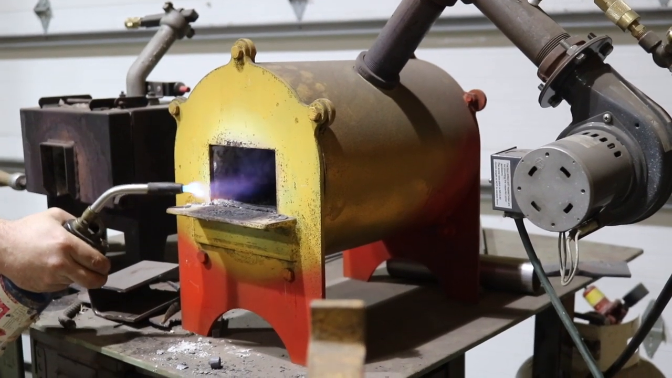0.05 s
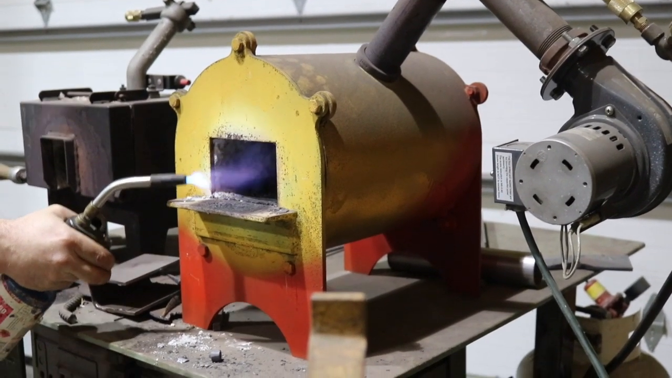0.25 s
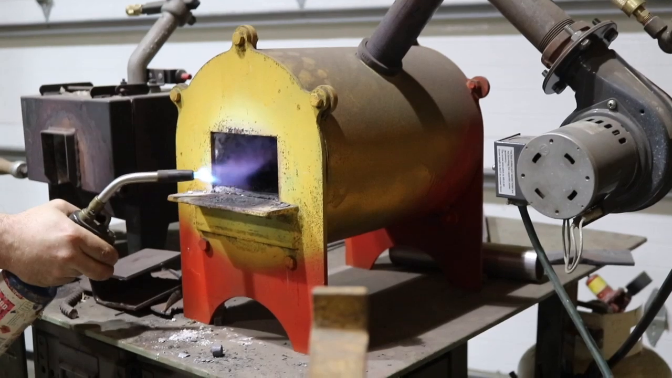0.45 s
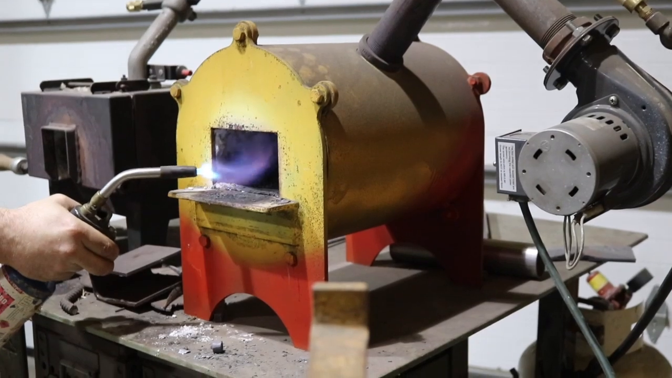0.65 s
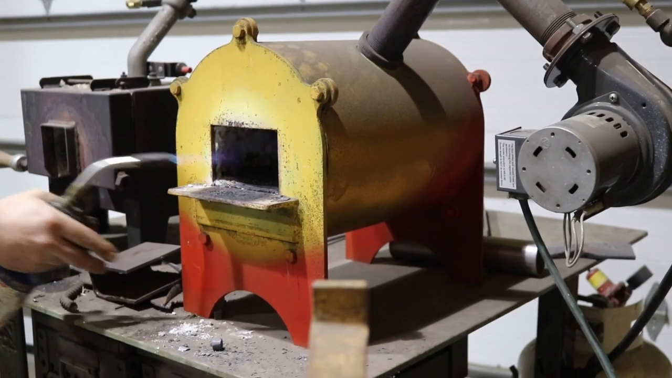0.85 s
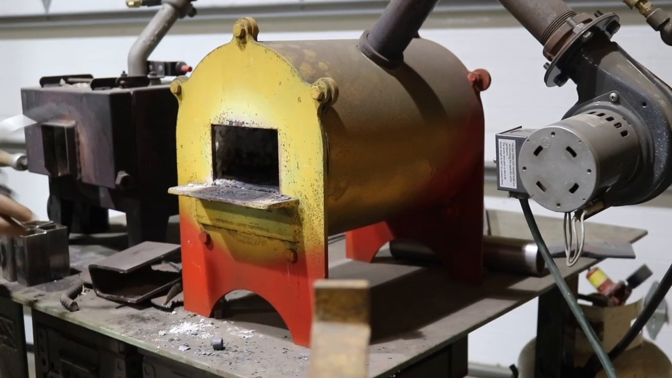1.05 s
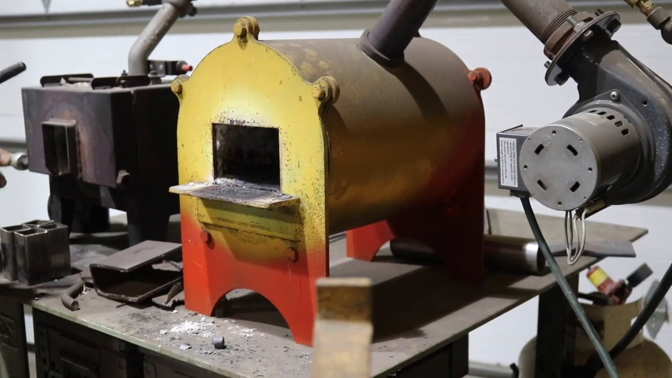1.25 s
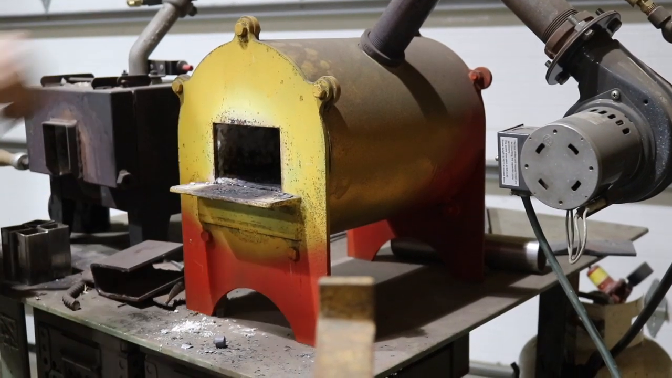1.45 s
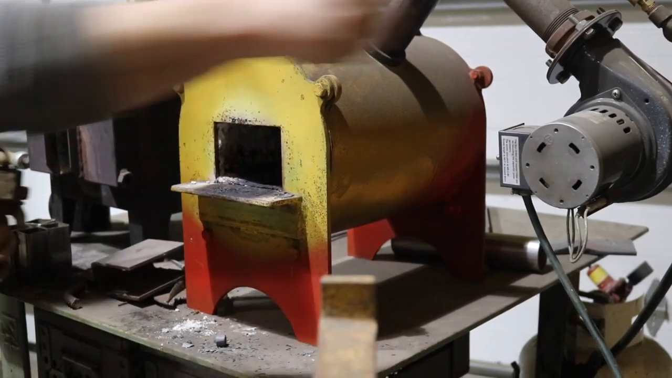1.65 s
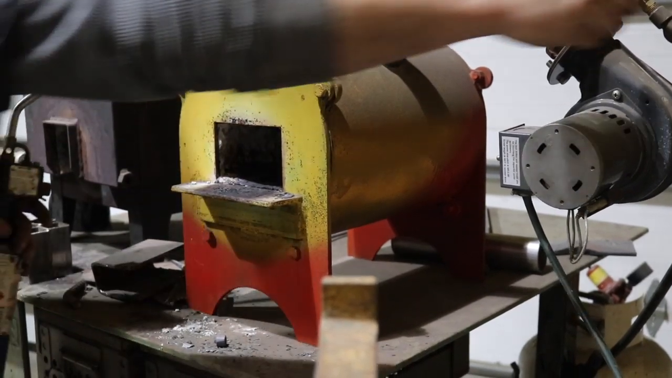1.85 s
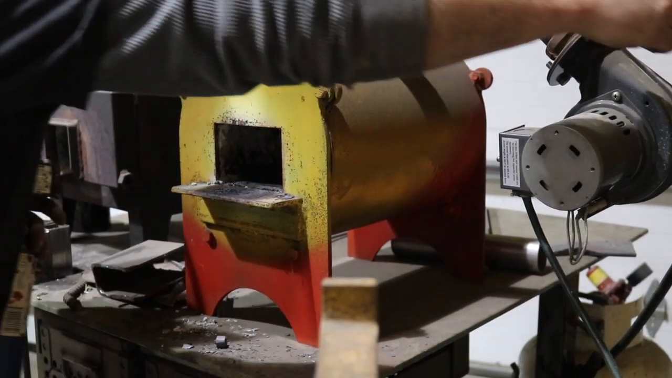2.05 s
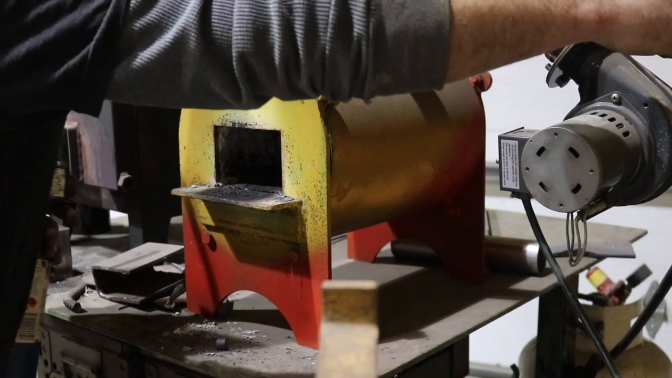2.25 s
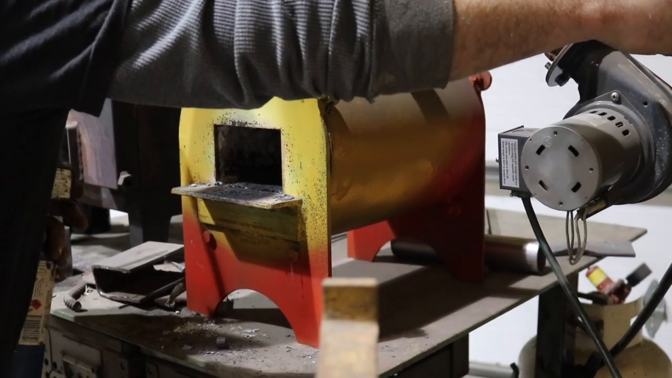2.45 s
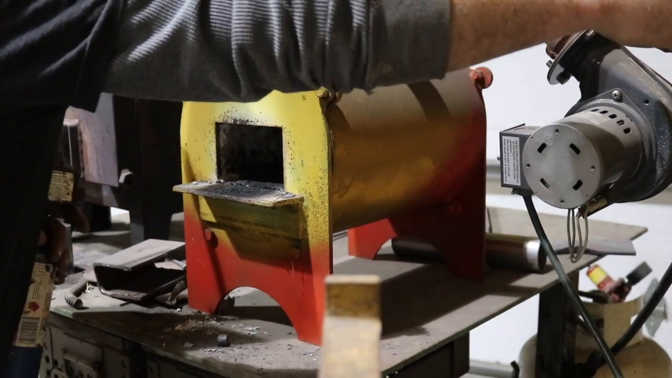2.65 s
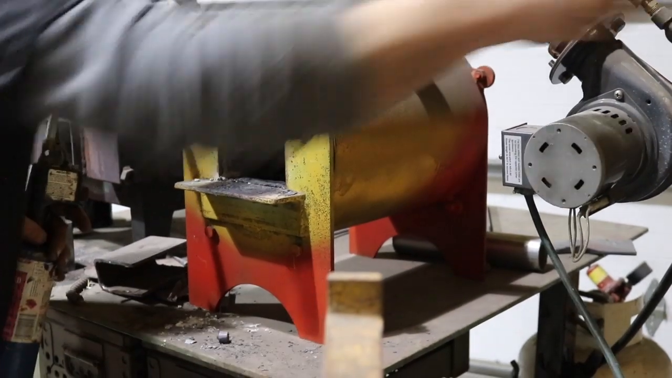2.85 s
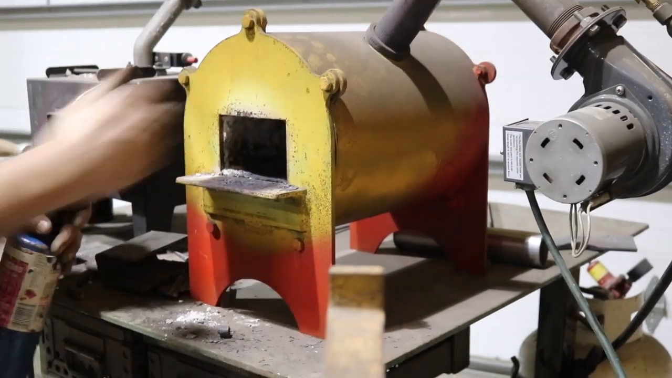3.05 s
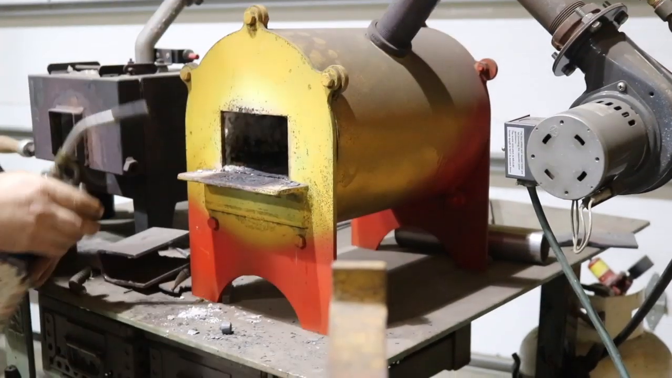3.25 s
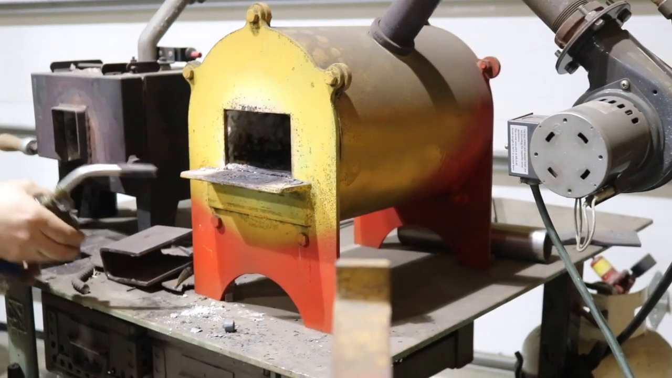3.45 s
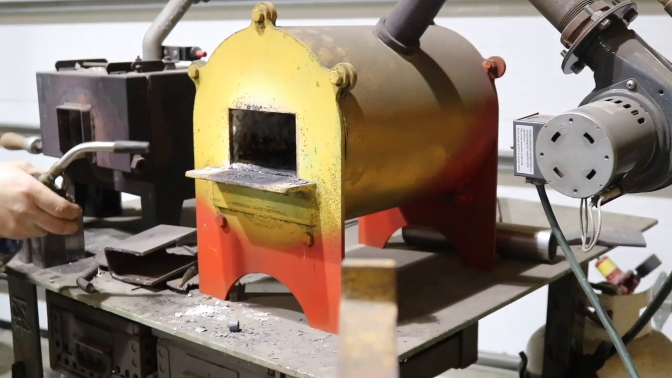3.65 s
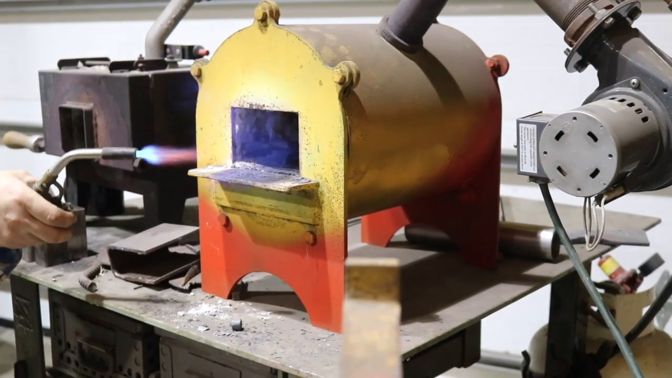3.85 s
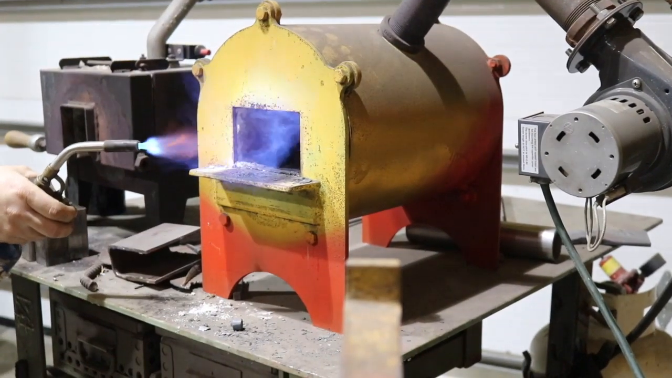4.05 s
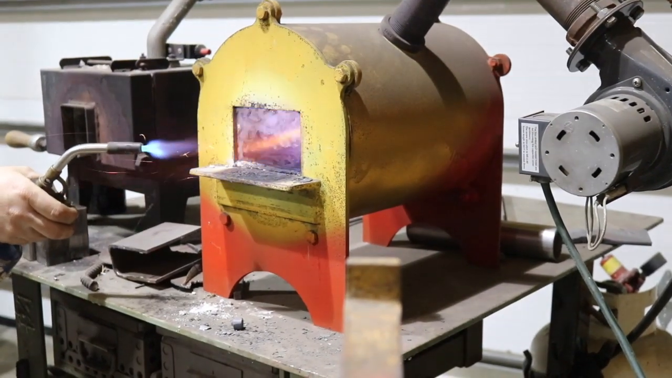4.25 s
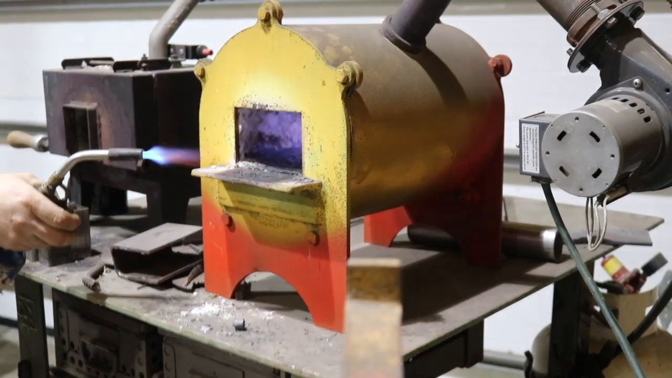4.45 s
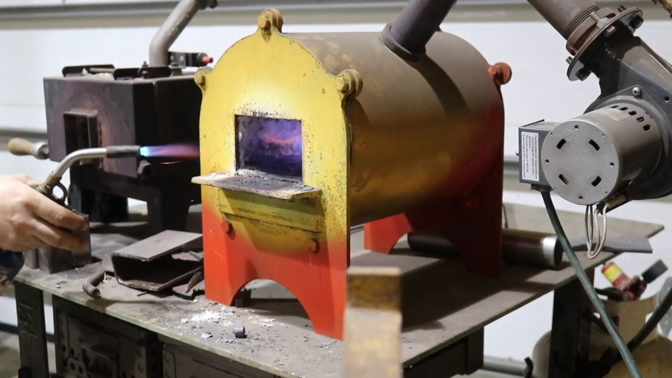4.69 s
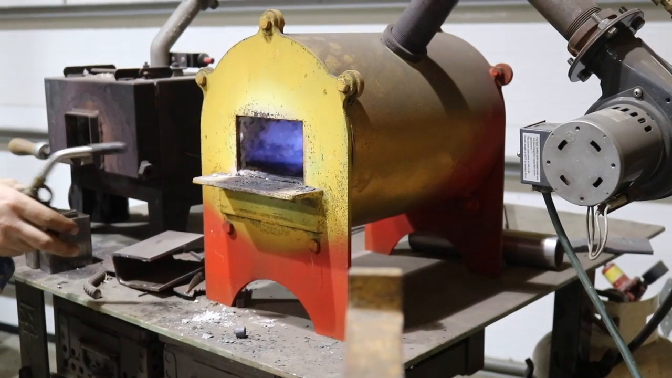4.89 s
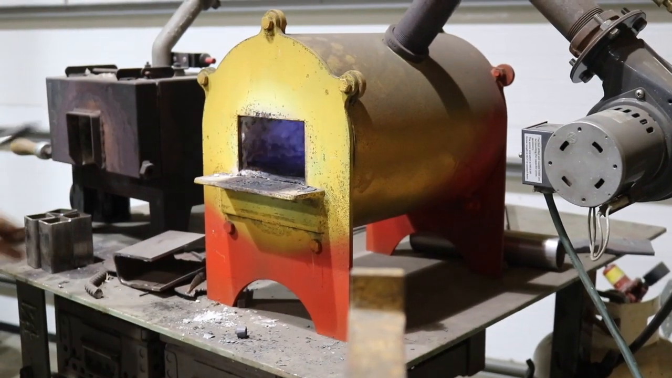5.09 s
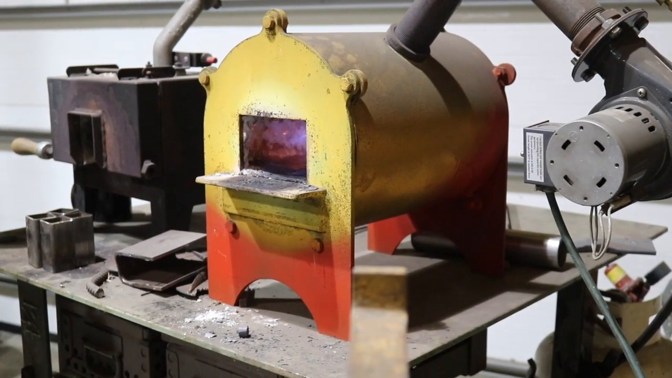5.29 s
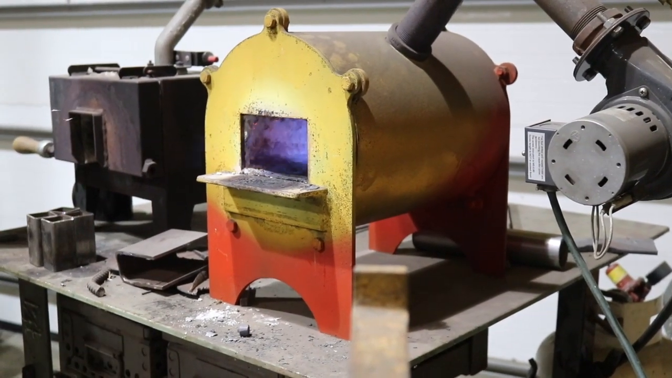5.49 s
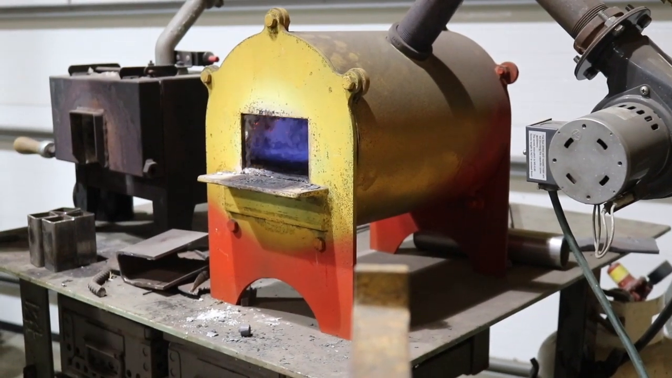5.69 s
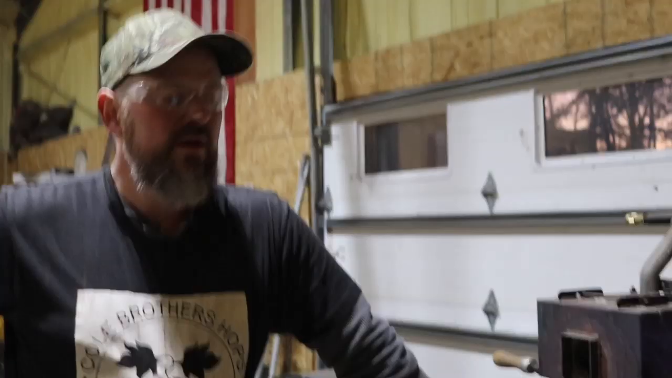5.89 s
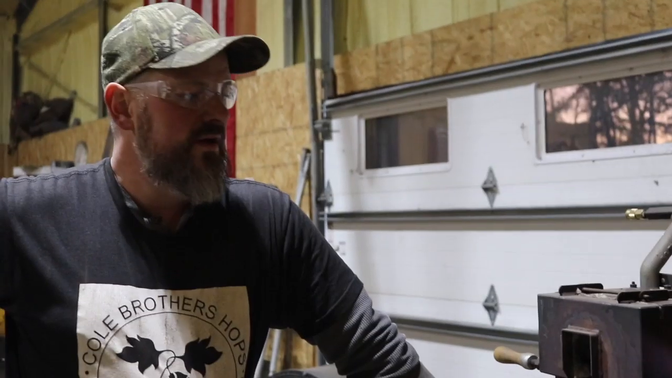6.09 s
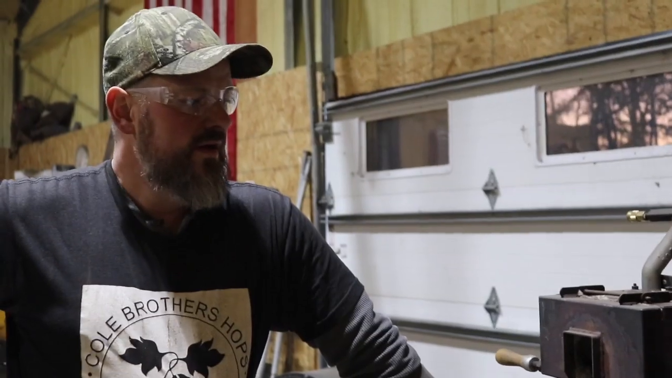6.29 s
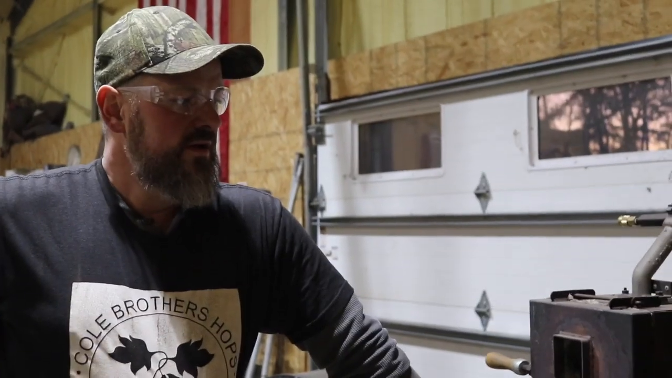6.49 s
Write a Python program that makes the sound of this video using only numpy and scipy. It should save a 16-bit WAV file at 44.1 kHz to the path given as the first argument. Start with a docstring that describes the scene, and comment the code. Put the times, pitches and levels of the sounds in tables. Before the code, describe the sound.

Torch flame roaring, near-quiet with blower hum and clicks, a sharp igniter crack, then a forge thudding alight into an uneven low roar.

```python
"""A gas torch roars at the mouth of a forge, shuts off, and is struck again once the gas valve is open.
Its flame is a shower of small pressure pops plus turbulent noise, with nozzle hiss above; it lights with a thump.
Clicks are cracks that ring metal, the valve is whistling noise, and scuffs are brushed noise with scratchy grains.
The burner catches and throbs as pockets of gas ring its chamber; after a short dropout it roars in quick uneven
surges. A blower of coloured noise and a thin whine runs beneath. Two close ports hear all this with the shop's echo."""
import sys
import numpy as np
from scipy import signal
from scipy.fft import rfft, irfft, next_fast_len
from scipy.io import wavfile
from scipy.ndimage import uniform_filter1d

SR = 44100
rng = np.random.default_rng(int(sys.argv[2]) if len(sys.argv) > 2 else 0)


def digitize_waveform(pressure):
    """Quantize a signal to 16-bit integers and store it at the path in sys.argv[1].

    Rows of a 2-D input are taken as channels; values are limited to [-1, 1].
    """
    field = np.atleast_2d(pressure).T
    bounded = np.clip(field, -1, 1)
    quanta = np.round(bounded * 32767).astype(np.int16)
    wavfile.write(sys.argv[1], SR, quanta)


N = 287835
T = np.arange(N) / SR
SIZE = next_fast_len(N + SR)
HZ = np.maximum(np.arange(SIZE // 2 + 1) * SR / SIZE, 1)

# Flame body as the torch is aimed and drawn back, one list a burn. Each row: time in seconds, level in dB.
TORCH_LEVELS = [
    [(0, -24.5), (.58, -26), (.78, -24), (.865, -35), (.905, -57)],
    [(3.72, -32.5), (3.9, -23.5), (4.15, -25), (4.235, -21.5), (4.33, -31), (4.42, -24), (4.6, -28),
     (4.71, -25.5), (4.76, -31), (4.82, -63)],
]
# Torch burns. Each row: gas on in seconds, lit in seconds, then rasp and nozzle hiss in dB re the flame body.
TORCH_BURNS = [(-.5, -.4, -1, -10.5), (3.73, 3.822, -8.5, -12)]
# Spectrum of the round flame body. Each row: frequency in Hz, density in dB per Hz.
FLAME_SPECTRUM = [(25, -33), (90, -13.5), (160, -5.5), (280, -12), (360, -1), (480, -5), (650, -1),
                  (850, -4.5), (1250, -14.5), (1700, -24), (2600, -29)]
# Spectrum of the raspy flame. Each row: frequency in Hz, density in dB per Hz.
RASP_SPECTRUM = [(700, -16), (1200, 1.5), (1900, 0.5), (2500, -6.5), (2950, -4.5), (3600, -15), (4300, -27)]
# Spectrum of gas hissing from the nozzle. Each row: frequency in Hz, density in dB per Hz.
NOZZLE_SPECTRUM = [(2500, -32), (4000, 0), (5850, 2), (8500, 2), (12000, 0), (16000, -11.5)]
# Spectrum of the blower's rushing air. Each row: frequency in Hz, density in dB per Hz.
BLOWER_SPECTRUM = [(25, -26), (120, -10.5), (240, -11.5), (310, -3.5), (550, -4.5), (1100, -3), (1600, -7),
                   (2300, -13.5), (3200, -13), (4500, -24), (8000, -24), (12000, -32), (16000, -34.5)]
# Fan housing resonances. Each row: frequency in Hz, width in Hz, gain in dB.
HOUSING_RINGS = [(1547, 36, 5.5), (1760, 89, -2.5), (2069, 46, 6.5)]
# Trigger, igniter and handling clicks. Each row: start in seconds, level in dB, time to die by 60 dB in
# seconds, dullness in dB per octave, metal ring in dB re the click's level.
CLICK_EVENTS = [(0.813, -20, 0.018, 3, -27), (1.6052, -23.5, 0.04, -1, -5), (1.8022, -28, 0.09, -2, -35),
                (3.491, -27, .02, 3, -25), (3.8347, -4, 0.011, -3, -41), (3.8364, -8, 0.02, 0, -26),
                (4.712, -22, .02, 1, -25)]
# Modes of the struck metal. Each row: frequency in Hz, level in dB, time to die by 60 dB in seconds.
METAL_MODES = [(1140, 5, 0.035), (1560, 6, 0.025), (2234, -2, 0.2), (2905, -12.5, 0.35),
               (3150, -11.5, 0.42), (3300, 3, .022), (3740, -4, 0.06), (7079, -10, 0.14)]
# Short resonances in every crack. Each row: frequency in Hz, width in Hz, gain in dB.
CRACK_RINGS = [(2290, 300, 9), (5700, 1400, 3), (8700, 800, 1.5), (10500, 920, 5.5)]
# Pipe fitting resonances. Each row: frequency in Hz, width in Hz, level in dB.
PIPE_RINGS = [(3180, 16, 14), (7000, 750, 2.5), (8200, 290, 4.5), (10750, 350, -2)]
# Swishes as the smith shifts. Each row: loudest moment in seconds, airy level in dB, scratchy level in dB.
SCUFF_EVENTS = [(3.55, -31, -27.5), (5.618, -38, -35)]
# Spectrum of the airy brushing. Each row: frequency in Hz, density in dB per Hz.
BRUSH_SPECTRUM = [(3500, -5), (5500, -0.5), (8500, -3), (12000, -12), (16000, -16)]
# Spectrum of scratching and spitting. Each row: frequency in Hz, density in dB per Hz.
SCRATCH_SPECTRUM = [(1500, -17), (2300, -11.5), (2800, -3.5), (3250, -3.5), (3800, -10), (5000, -25)]
# The torch's lighting thump, then pockets of gas going off in the chamber. Each row: start in seconds,
# level in dB, ring in Hz, time to die by 60 dB in seconds, bright flash in dB re the ring.
THUMP_EVENTS = [(3.835, -20.5, 210, 0.043, -29), (4.219, -10.5, 160, 0.12, -10.5),
                (4.305, -10, 225, 0.078, -13.5), (4.329, -6.5, 186, 0.076, -37),
                (4.398, -18, 184, 0.085, -13), (4.512, -4.5, 208, 0.022, -25),
                (4.635, -8.5, 175.5, 0.05, -19), (4.703, -11.5, 72, 0.039, -22),
                (4.763, -10.5, 104, 0.04, -18), (4.798, -16, 181.6, 0.12, -20),
                (4.826, -17, 238, 0.089, -17), (4.898, -16, 93, 0.05, -16), (4.969, -13.5, 166, 0.081, -27),
                (5.055, -5.5, 160, 0.041, -27), (5.133, -10, 155, 0.026, -20),
                (5.186, -24.5, 194, 0.056, -12), (5.27, -14, 190, 0.073, -19),
                (5.334, -4, 116, 0.028, -21.5), (5.399, -25, 190, 0.083, -8), (5.534, -17, 172, 0.07, -9),
                (5.587, -10.5, 147, 0.025, -26), (5.632, -10.5, 258, 0.05, -19),
                (5.712, -6.5, 183, 0.043, -24), (5.803, -12.5, 191, 0.09, -25)]
# Spectrum of the burner's rumble before the scene changes. Each row: frequency in Hz, density in dB per Hz.
EARLY_SPECTRUM = [(20, -29), (60, -10), (130, -9), (187, -5), (208, -4), (232, -4), (275, -6), (310, -16.5),
                  (355, -12.5), (420, -20.5), (700, -30), (950, -51)]
# Spectrum of the bright part of fire and flashes. Each row: frequency in Hz, density in dB per Hz.
LICK_SPECTRUM = [(350, 9), (1200, -0.5), (3000, -15.5), (5000, -22.5), (9000, -19), (16000, -41)]
# Spitting of the torch flame. Each row: loudest moment in seconds, level in dB, half length in seconds.
SPIT_EVENTS = [(3.897, -34.5, 0.033), (4.39, -36.5, 0.021), (4.708, -31.5, 0.01)]
# Spectrum of the burner's roar after the scene changes. Each row: frequency in Hz, density in dB per Hz.
LATER_SPECTRUM = [(20, -27), (90, -10), (150, -6), (190, -3), (250, -0.5), (295, -16), (352, -13), (420, -18),
                  (800, -29.5), (1000, -37)]
# Colour that walls, bench and microphone body give to everything.
# Each row: frequency in Hz, width in Hz, gain in dB.
SURROUNDINGS = [(176, 54, 2.5), (231.5, 5, 5.5), (354, 47, 4.5), (421, 24, -8.5), (546.6, 11, 3.5),
                (883, 138, -5.5), (1107, 185, 2.5), (1635, 35, 5.5), (3210, 82, 4), (4760, 270, -2.5),
                (5890, 230, 5.5)]
# Shading of the ports by the microphone body. Each row: frequency in Hz, left minus right in dB.
PORT_SHADE = [(30, -4), (500, 1.7), (2400, -2.5), (5000, -2)]

UNLIT_DB = 1.5  # extra hiss of unlit gas
CATCH_S, RASP_CATCH_S = 0.045, 0.06  # build-up of flame body and rasp
JET_HZ, JET_WIDTH_HZ, JET_DB = 5800, 900, -5  # whistle of unlit gas, level re the hiss
BLOWER_DB, LATER_BLOWER_DB = -37, -3  # level, and its change after the dropout
WHINE_HZ, WHINE_DB = 2696, -27  # motor tone, level re the rush
CLICK_ALIKE_HZ = 3520  # above it a crack reaches the two ports by different paths
VALVE_S, VALVE_OPENING_S, VALVE_DB, VALVE_SAG_DB_PER_S = 2.48, 0.61, -51, 1.2
SWELL_S, EBB_S = 0.14, 0.09  # airy brushing: time to come up or go down by 10 dB
SCRATCH_SWELL_S, SCRATCH_EBB_S = 0.06, 0.085  # the same for the scratch
LIGHTS_S, LIGHT_UP_S = 4.15, 0.05
EARLY_DB, LATER_DB = -23.5, -16  # burner before and after the dropout
BRIGHT_DB, LATER_BRIGHT_DB = -19.5, -23.5  # bright part re the rumble, before and after the scene changes
WHOOSH_DB, WHOOSH_S = 22, 0.056  # extra brightness as the burner lights
SHOP_T60_S, SHOP_DB, SHOP_DAMP_HZ = 0.74, -0.5, 3940
ALIKE_HZ, UNLIKE_BASS = 880, 0.053  # corner and unrelated share of the bass in a diffuse field
DROP_S, RETURN_S, FADE_S = 5.903, 5.963, 0.025
TOP_HZ = 15880


def undb(db):
    """Logarithmic level: decibels to amplitude gain."""
    return 10 ** (np.asarray(db) / 20)


def unit(x):
    """Normalisation: scale to rms 1."""
    return x / np.sqrt(np.mean(x ** 2))


def shape(x, gain):
    """Linear filtering: multiply the spectrum by a gain for every frequency."""
    return irfft(rfft(x, SIZE) * gain, SIZE)[..., :N]


def tint(x, table):
    """Spectral shaping: colour a sound by (Hz, dB) points and bring it to rms 1."""
    hz, db = np.transpose(table)
    level_db = np.interp(np.log(HZ), np.log(hz), db, left=-90, right=-90)
    return unit(shape(x, undb(level_db)))


def bell(hz, width):
    """Resonance: power response, 1 at the centre."""
    return 1 / (1 + (2 * (HZ - hz) / width) ** 2)


def curve(spans):
    """Envelopes: gain along time from (s, dB) tables, silent outside them."""
    return [undb(np.interp(T, *np.transpose(s), left=-200, right=-200)) for s in spans]


def ramp(start, length):
    """Linear onset: 0 before start, rising to 1 over length."""
    return np.clip((T - start) / length, 0, 1)


def walk(rate):
    """Random modulation: levels held 1 / rate s and smoothed twice, rms 1."""
    hold = int(SR / rate)
    steps = np.repeat(rng.standard_normal(N // hold + 1), hold)
    return unit(uniform_filter1d(uniform_filter1d(steps, hold), hold)[:N])


def grains(rate, spread_db):
    """Shot noise: one-sided pops at random moments, a few much larger."""
    return (rng.random(N) < rate / SR) * undb(spread_db * rng.exponential(size=N))


def even(x):
    """Level regulation: the gas supply evens out slow swells."""
    return x / np.sqrt(uniform_filter1d(x ** 2, SR // 12))


def place(x, lag_s, pan_db):
    """Time and level differences: left port late by lag_s and louder by pan_db."""
    side = np.array([[1], [-1]]) / 2
    return shape(x, undb(pan_db * side) * np.exp(-2j * np.pi * HZ * lag_s * side))


def spread(three):
    """Diffuse-field coherence: long waves reach both ports nearly alike, short ones unrelated."""
    alike = (1 - UNLIKE_BASS) / (1 + (HZ / ALIKE_HZ) ** 2)
    return np.sqrt(alike) * three[0] + np.sqrt(1 - alike) * three[1:]


def torch():
    """Combustion noise: turbulent burning is a shower of pressure pops, round and raspy, under nozzle hiss."""
    burning = unit(grains(2500, 2.6)) + 1.07 * rng.standard_normal(N)
    body = even(tint(burning, FLAME_SPECTRUM)) * undb(1.6 * walk(70) + 0.6 * walk(14))
    rasp = even(tint(burning, RASP_SPECTRUM)) * undb(1.6 * walk(70) + 0.6 * walk(14))
    hiss = tint(rng.standard_normal(N), NOZZLE_SPECTRUM) * undb(1.57 * walk(30))
    jet = unit(shape(rng.standard_normal(N), bell(JET_HZ, JET_WIDTH_HZ))) * undb(JET_DB)
    out = 0
    for level, (gas, lit, rasp_db, hiss_db) in zip(curve(TORCH_LEVELS), TORCH_BURNS):
        unlit = T < lit
        flow = ramp(gas, 0.028) * undb(hiss_db + UNLIT_DB * unlit)
        flame = body * ramp(lit, CATCH_S) + undb(rasp_db) * rasp * ramp(lit, RASP_CATCH_S)
        out = out + level * (flame + (hiss + jet * unlit) * flow)
    return out


def blower():
    """Flow noise: air rushes through a resonant housing, direct and diffuse; quieter after the dropout."""
    housing = undb(sum(db * bell(hz, width) for hz, width, db in HOUSING_RINGS))
    air = []
    for _ in range(4):  # one direct, three for the diffuse field
        rush = shape(tint(rng.standard_normal(N), BLOWER_SPECTRUM), housing)
        air.append(rush * undb(0.39 * walk(5.37) + 0.96 * walk(20)))
    whine = np.sin(2 * np.pi * WHINE_HZ * T) * undb(WHINE_DB + 2 * walk(4))
    filled = irfft(spread(rfft(air[1:], SIZE)), SIZE)[:, :N]
    level = undb(BLOWER_DB + LATER_BLOWER_DB * (T > DROP_S))
    return (place(air[0] + whine, 9e-5, -1.7) + 0.9 * filled) * level


def clicks():
    """Impact excitation: a short crack, tilted dull or bright, rings the metal; one track for each port."""
    out, t = np.zeros((2, N)), T[:SR // 4]
    ring = sum(undb(db) * np.sin(2 * np.pi * hz * t) * np.exp(-np.log(1000) * t / t60)
               for hz, db, t60 in METAL_MODES)
    hz = np.arange(len(t) // 2 + 1) * SR / len(t)
    octaves = np.log2(np.maximum(hz, 800) / 5000)
    band = hz ** 2 / (hz ** 2 + 900 ** 2) / (1 + (hz / 12900) ** 12)
    band = band * undb(sum(db / (1 + (2 * (hz - f) / width) ** 2) for f, width, db in CRACK_RINGS))
    alike = 1 / (1 + (hz / CLICK_ALIKE_HZ) ** 4)
    noises = rfft(rng.standard_normal((len(CLICK_EVENTS), 3, len(t))))
    for (s, db, length, dull_db, ring_db), noise in zip(CLICK_EVENTS, noises):
        ports = np.sqrt(alike) * noise[0] + np.sqrt(1 - alike) * noise[1:]
        crack = unit(irfft(ports * undb(-dull_db * octaves) * band, len(t)))
        crack = crack * np.exp(-np.log(1000) * t / length)
        i = int(s * SR)
        out[:, i:i + len(t)] += undb(db) * (crack + undb(ring_db) * ring)
    return out


def valve():
    """Resonant jet noise: gas whistles thinly in the pipe fittings and sags slowly once the valve is open."""
    rings = np.sqrt(sum(undb(2 * db) * bell(hz, width) for hz, width, db in PIPE_RINGS))
    sag_db = VALVE_SAG_DB_PER_S * np.maximum(T - VALVE_S - VALVE_OPENING_S, 0)
    hiss = unit(shape(rng.standard_normal(N), rings))
    return hiss * ramp(VALVE_S, VALVE_OPENING_S) * undb(VALVE_DB - sag_db)


def arch(s, db, swell, ebb):
    """Swell and decay: a level arch, 10 dB down at swell before and ebb after its peak."""
    return undb(db - 10 * (np.abs(T - s) / np.where(T < s, swell, ebb)) ** 2.1)


def scuffs():
    """Friction noise: a smooth airy brushing with a grainier scratch in its middle."""
    rubbing = 0.4 * unit(grains(2000, 2.5)) + rng.standard_normal(N)
    scratch = tint(rubbing, SCRATCH_SPECTRUM) * undb(2.2 * walk(130) + 1.6 * walk(45))
    air = tint(rng.standard_normal(N), BRUSH_SPECTRUM)
    out = 0
    for s, air_db, scratch_db in SCUFF_EVENTS:
        out = out + air * arch(s, air_db, SWELL_S, EBB_S)
        out = out + scratch * arch(s, scratch_db, SCRATCH_SWELL_S, SCRATCH_EBB_S)
    return out


def burner_and_thumps():
    """Damped resonance: the torch's lighting thump, then uneven rumbling fire and gas pockets ringing the chamber."""
    rumble = ramp(LIGHTS_S, LIGHT_UP_S) ** 2 * undb(EARLY_DB + 1.07 * walk(28))
    # before the scene changes the burner's flame flares with each thump and sags between them
    flare = sum(np.exp(-((T - s - 0.015) / 0.035) ** 2) for s, *_ in THUMP_EVENTS)
    rumble *= 0.44 + 0.7 * np.minimum(flare, 1)
    lick = tint(rng.standard_normal(N), LICK_SPECTRUM)
    roar = even(tint(rng.standard_normal(N), EARLY_SPECTRUM))
    whoosh_db = WHOOSH_DB * np.exp(-((T - LIGHTS_S - LIGHT_UP_S) / WHOOSH_S) ** 2)
    out = rumble * (roar + undb(BRIGHT_DB + whoosh_db + 1.5 * walk(14)) * lick)
    t = T[:SR // 4]
    for s, db, hz, t60, flash_db in THUMP_EVENTS:
        i = int(s * SR)
        swell = (1 - np.exp(-t / 0.003)) ** 2 * np.exp(-np.log(1000) * t / t60)
        phase = 2 * np.pi * hz * t
        thump = np.sin(phase) + 0.26 * np.sin(1.7 * phase) - 0.34 * np.sin(0.44 * phase)
        flash = undb(flash_db) * lick[i:i + len(t)]
        out[i:i + len(t)] += undb(db) * swell / swell.max() * (thump + flash)
    return out


def sputters():
    """Impulsive noise: short bursts of crackle in the torch flame."""
    spit = tint(grains(1600, 4.1), SCRATCH_SPECTRUM)
    return spit * sum(undb(db) * np.exp(-((T - s) / half) ** 2) for s, db, half in SPIT_EVENTS)


def later_burner():
    """Turbulent combustion: after the scene changes the burner roars fully, in quick uneven surges."""
    roar = even(tint(rng.standard_normal(N), LATER_SPECTRUM))
    lick = tint(rng.standard_normal(N), LICK_SPECTRUM)
    return undb(LATER_DB + 1.7 * walk(50)) * (roar + undb(LATER_BRIGHT_DB) * lick)


def shop(x):
    """Reverberation: treble dies sooner, air swallows the top, and the bass is mostly direct."""
    t = T[:SR]
    noise = rng.standard_normal((3, SR)) * (1 - np.exp(-t / 0.00035))
    slow = rfft(noise * np.exp(-np.log(1000) * t / SHOP_T60_S), SIZE)
    quick = rfft(noise * np.exp(-np.log(1000) * t / (0.45 * SHOP_T60_S)), SIZE)
    low = 1 / (1 + (HZ / SHOP_DAMP_HZ) ** 2)
    tail = (low * slow + (1 - low) * quick) / np.sqrt(SR * SHOP_T60_S / np.log(1000) / 2)
    band = (0.39 + 0.75 * HZ / (HZ + 700)) / (1 + (HZ / 11000) ** 4)
    return shape(x, undb(SHOP_DB) * band * spread(tail))


def scene():
    """Superposition: direct sounds placed at the two ports, plus echo, blower and surrounding colour."""
    flame, snaps, gas = torch() + sputters(), clicks(), valve()
    feet, fire, hot = scuffs(), burner_and_thumps(), later_burner()
    pipe = place(gas, 9e-5, -1.8)
    direct = place(flame, -0.000026, 0.94) + place(snaps, -0.000096, 3.3) + pipe
    direct = direct + place(feet, -0.000088, -0.92) + place(fire, 2e-5, 0.1)
    # what excites the echo before and after the dropout
    before = flame + 1.12 * snaps.mean(axis=0) + 0.53 * feet + 0.81 * fire + gas
    after = 1.1 * hot + gas
    echo = shop(np.array([[before], [after]]))
    later = place(hot, 6e-5, 0.16) + pipe + echo[1]
    heard = np.where(T < (DROP_S + RETURN_S) / 2, direct + echo[0], later) + blower()
    shade_hz, shade_db = np.transpose(PORT_SHADE)
    port_db = np.interp(np.log(HZ), np.log(shade_hz), shade_db) * np.array([[1], [-1]]) / 2
    colour_db = sum(db * bell(hz, width) for hz, width, db in SURROUNDINGS)
    return shape(heard, undb(colour_db - 1.5 + port_db))


def record(dry):
    """Saturation and band limiting: peaks are rounded, the sound stops dead and fades back, the top is cut."""
    gate = np.where(T < DROP_S, 1, np.clip((T - RETURN_S) / FADE_S, 0, 1) ** 2)
    rounded = np.tanh(0.6 * dry) / 0.6
    lowpass = signal.ellip(14, 0.3, 60, TOP_HZ, fs=SR, output="sos")
    return signal.sosfilt(lowpass, rounded * gate)


dry = scene()
out = record(dry)
digitize_waveform(out)
```